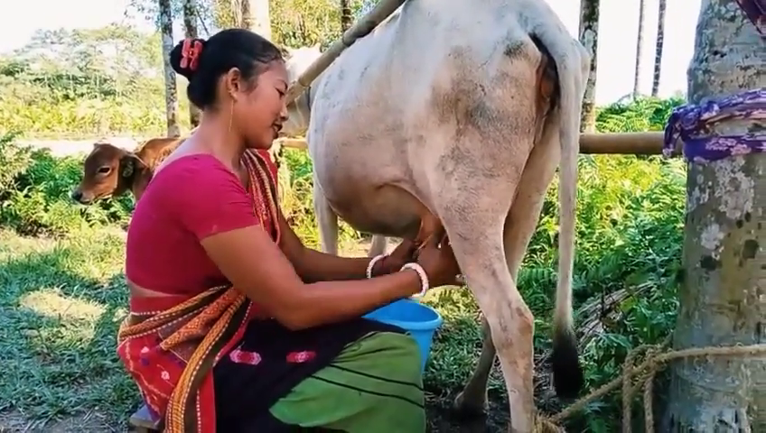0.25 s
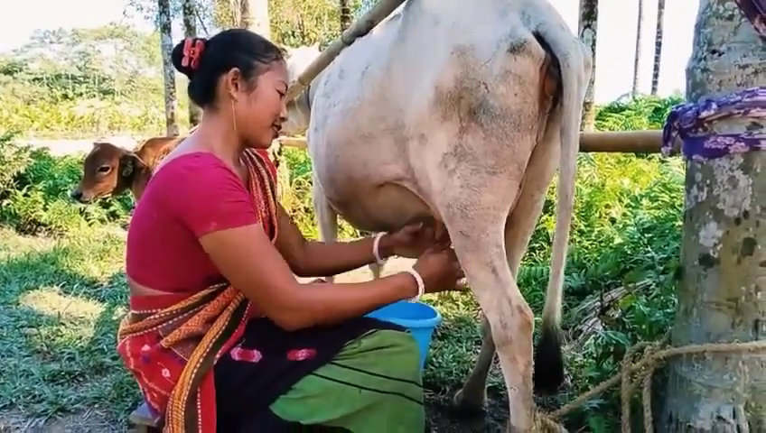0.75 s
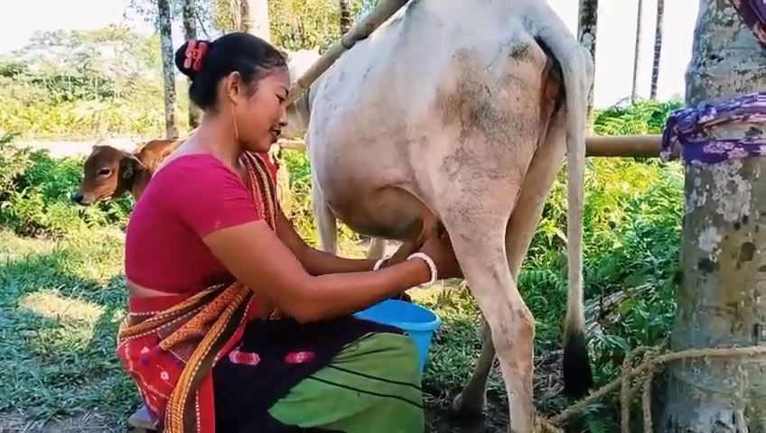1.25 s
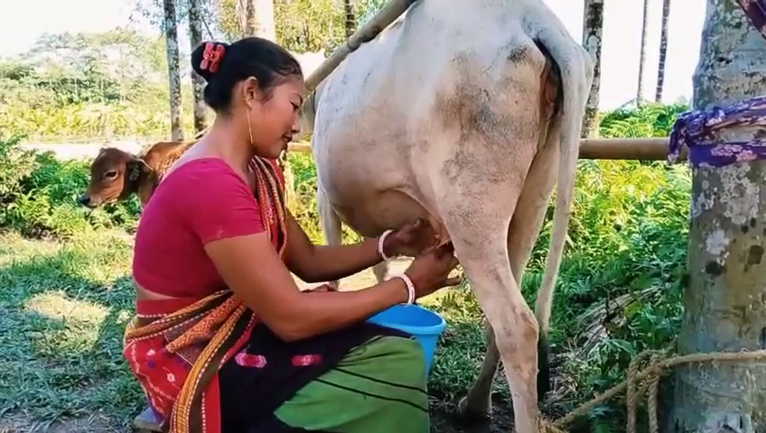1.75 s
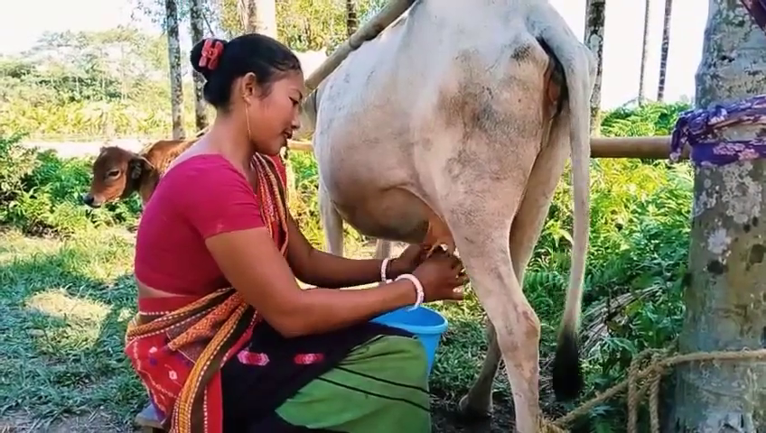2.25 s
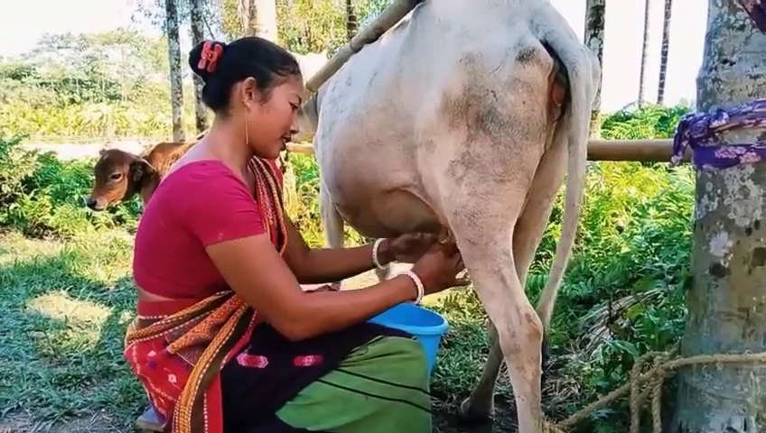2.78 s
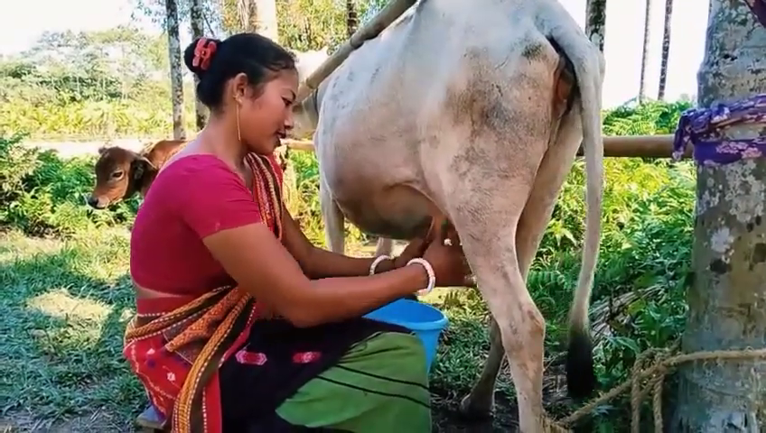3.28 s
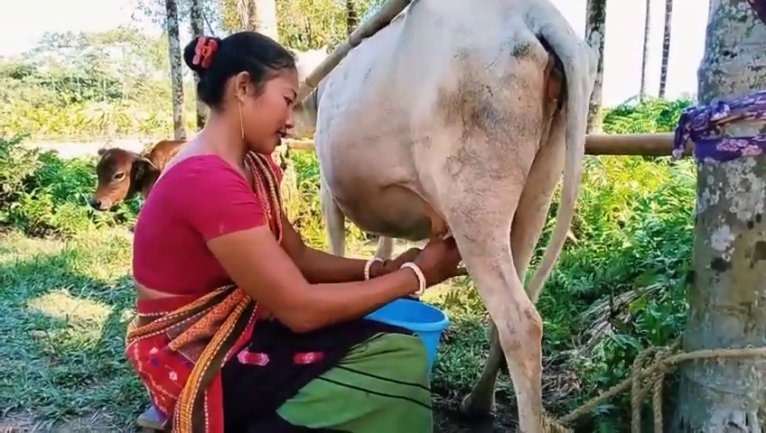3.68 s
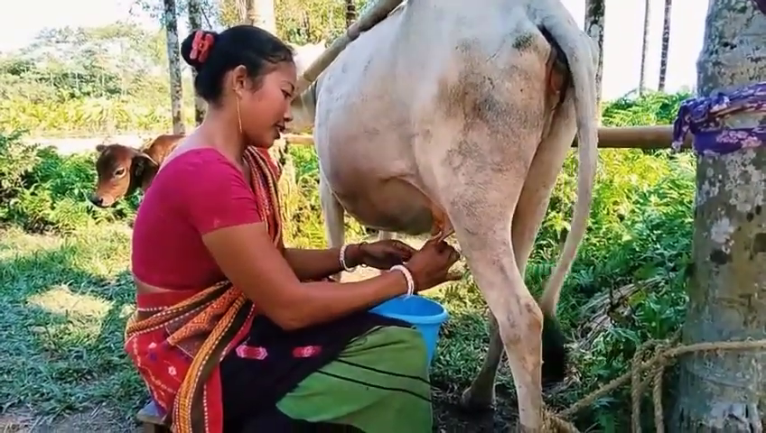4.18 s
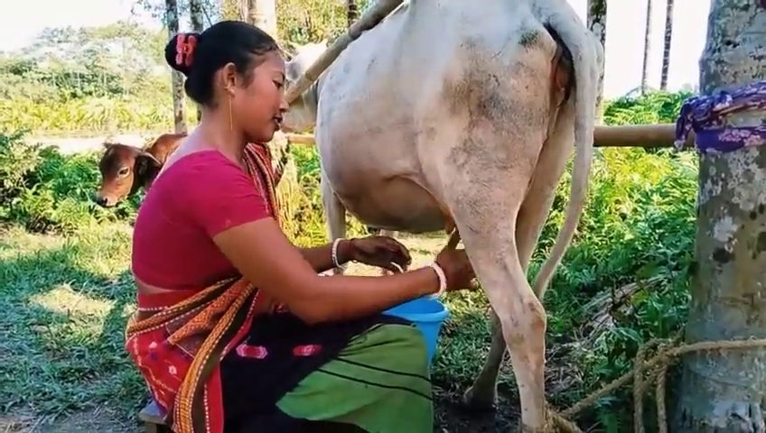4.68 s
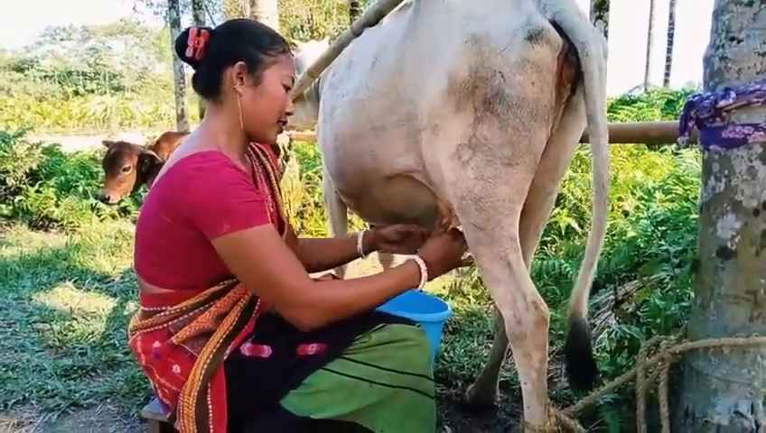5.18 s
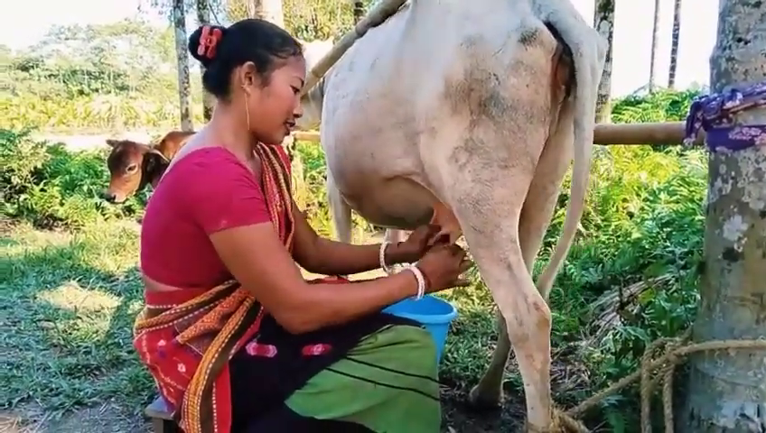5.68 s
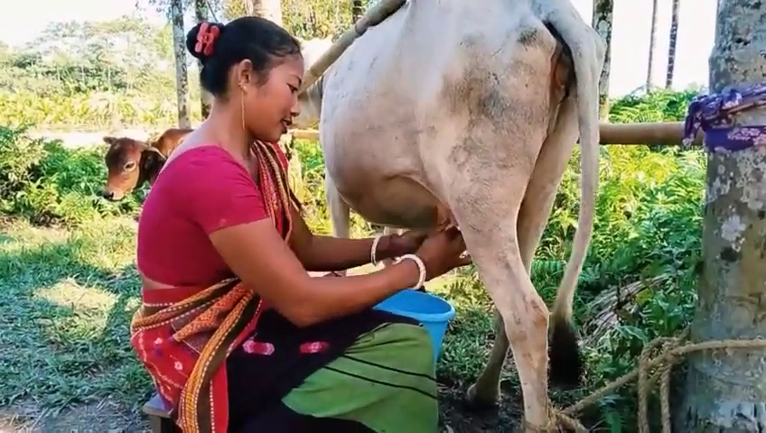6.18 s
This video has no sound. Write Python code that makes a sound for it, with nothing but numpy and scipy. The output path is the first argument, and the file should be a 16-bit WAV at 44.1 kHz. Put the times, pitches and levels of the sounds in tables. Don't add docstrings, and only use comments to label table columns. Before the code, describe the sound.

Outdoors, a stereo microphone sits close to a plastic bucket during hand milking, for about 6.4 seconds. A weak jet is already running at 0 and dies quickly. Further spurts start near 0.3, 1.25, 1.85, 2.35, 3.35, 3.9, 5.3, 5.9 and 6.25, the last still running at the end. Each opens with a small dull slap, sprays in a grainy hiss, and often swings into a hollow wall drumming; the one from 3.9 is long and uneven, the one at 5.9 hard and bright. Stray drops ping around them, strongly near 2.5, 4.05 and 4.3. Dull hooves shift at 0.6, 1.5 and 2.4. A small bird whistles faintly near 0.9, 1.05 and 3.2, echoed by trees. A distant engine drones low over rumble, dulling after 4.2; fainter motors change pitch before 3.5. Leaves hiss and insects buzz thinly throughout.

```python
import sys
import numpy as np
from scipy import signal
from scipy.fft import rfft, irfft, next_fast_len
from scipy.io import wavfile
from scipy.ndimage import uniform_filter1d, map_coordinates

SR = 44100
rng = np.random.default_rng(int(sys.argv[2]) if len(sys.argv) > 2 else 0)


def voltage_ratio(level):
    return 10 ** (np.asarray(level, float) / 20)


def output_pcm(signal):
    pcm = np.clip(np.atleast_2d(signal).T, -1, 1) * 32767
    wavfile.write(sys.argv[1], SR, np.round(pcm).astype(np.int16))


N = 284127


def unit(x):
    return x / np.sqrt(np.mean(x ** 2) + 1e-20)


def along(points, hz):
    f, v = np.transpose(points)
    return np.interp(np.log(hz + 1), np.log(f + 1), v)


def curves(rows, outside=None):
    s, *cols = np.transpose(rows)
    return [np.interp(np.arange(N) / SR, s, c, outside, outside) for c in cols]


def wobble(rate):
    return map_coordinates(rng.standard_normal(int(N * rate / SR) + 4), [np.arange(N) * rate / SR])


def noise():
    return rng.standard_normal((2, N))


def filtered(x, response):
    m = next_fast_len(N + SR // 2)
    return irfft(rfft(x, m) * response(np.fft.rfftfreq(m, 1 / SR)), m)[..., :N]


def modes(table, steep=1):
    def response(f):
        plain = 0
        for k, (c, w, db) in enumerate(table):
            plain = plain + (-1) ** k * voltage_ratio(db) * 1j * f * w / (c * c - f * f + 1j * f * w)
        return plain * abs(plain) ** (steep - 1)
    return response


def ports(pair, alike, side, phase):
    def blend(hz):
        turn = np.arccos(np.clip(along(alike, hz), -1, 1)) / 2
        return np.array([np.cos(turn), np.sin(turn)])

    def lean(hz):
        tilt = voltage_ratio(along(side, hz) / 2) * np.exp(.5j * np.interp(hz, *np.transpose(phase)))
        return np.array([tilt, 1 / tilt])

    a, b = filtered(pair, blend)
    return filtered(np.array([a + b, a - b]), lean)


def patchy(pair, patchy_db, size):
    z = signal.stft(pair, nperseg=512)[2]

    def field(bins, frames):
        grain = uniform_filter1d(rng.standard_normal(z.shape[1:]), bins, 0)
        return unit(uniform_filter1d(grain, frames, 1))

    gain = voltage_ratio(patchy_db * (field(*size) + 1.13 * field(2, 3) + 0.81 * field(3, 16)))
    return signal.istft(z * gain, nperseg=512)[1][:, :N]


def tone(rows):
    hz, db = curves(rows)[0], curves(rows, -150)[1]
    return np.sqrt(2) * voltage_ratio(db) * np.sin(2 * np.pi * np.cumsum(hz) / SR)


def spurt(rows, fine_db, cut_db):
    onset_s, onset_db = .012, 11.5
    cut_s, trickle_s, trickle_db = 0.012, 0.056, 10
    (s0, db0, aim0), (s1, db1, aim1) = rows[0], rows[-1]
    opens = [(s0 - 1.36 * onset_s, db0 - onset_db - 39, aim0 - .3), (s0 - onset_s, db0 - onset_db, aim0 - .3)]
    ends = [(s1 + cut_s + k * trickle_s, db1 - cut_db - k * trickle_db, aim1) for k in (0, 1, 4)]
    db, aim = curves(opens + rows + ends)
    return db, aim, np.full(N, fine_db)


def splashes():
    spits = (rng.random(N) < 160 / SR) * 4.5 * rng.random(N)
    spread = signal.lfilter([1], [1, -np.exp(-1 / (0.0026 * SR))], spits)
    return spread + 2.3 * wobble(260) + 0.51 * wobble(70)


def ringing(table, clumps, clump_share, steep):
    hits = noise() * voltage_ratio(clump_share * clumps + 1.05 * wobble(120))
    return unit(filtered(hits, modes(table, steep)))


# (frequency [Hz], width [Hz], level [dB])
WALL_MODES = [(1054, 102, 2), (1158, 155, 5), (1270, 86, -7), (1505, 257, 1.5), (1752, 200, -5.5),
              (2000, 210, 2.5), (2216, 320, 0.5)]


def wall(aim, clumps):
    spot_hz = 1806 * (1328 / 1806) ** aim
    shares = []
    for hz, width, db in WALL_MODES:
        away_db = 30 * np.log(np.maximum(spot_hz, 500) / hz) ** 2 / 0.56
        damped_db = 59 * np.log(np.maximum(spot_hz / hz, 1)) ** 2
        shares.append(voltage_ratio(db + 3.5 * wobble(13) - away_db - damped_db))
    shares = np.array(shares) / np.linalg.norm(shares, axis=0)
    return sum(share * ringing([mode], clumps, 0.28, 2.29) for share, mode in zip(shares, WALL_MODES))


# (time [s], jet pressure [dB], aim [0 = glancing high on the wall, 1 = square on its belly])
FIRST_HAND_SPURTS = [
    [(0.0, -43, 0.88), (0.046, -45, 0.7), (0.112, -59.5, 1.35), (0.154, -59, 0.47)],
    [(1.259, -42.5, 0.43), (1.312, -29.5, 0.038), (1.406, -33.5, 0.5), (1.538, -32, 0.85),
     (1.58, -41, 0.69)],
    [(2.348, -47.5, 0.22), (2.37, -33.5, .2), (2.492, -33, 0.21), (2.532, -33.5, 0.64), (2.55, -61, 1)],
    [(3.867, -45, 0.41), (3.907, -39.5, 0.3), (3.961, -45.5, 0.53), (4.027, -32, 0.32), (4.093, -35, 0.46),
     (4.355, -41, 0.66), (4.54, -44, 0.99), (4.645, -56, 0.44)],
    [(5.902, -54, 0.28), (5.944, -31, .0), (6.028, -26.5, 0.12), (6.118, -42.5, 1.06), (6.186, -56.5, 1.16)],
]
SECOND_HAND_SPURTS = [
    [(0.278, -47, 0.44), (0.332, -35.5, 0.19), (0.452, -34, 0), (0.516, -41, 0.62), (0.572, -44.5, 0.68)],
    [(1.822, -53.5, 0), (1.878, -40.5, 0.02), (2.004, -32, .2), (2.03, -41, 0.72), (2.118, -39, 0.56),
     (2.208, -57, 0.94), (2.27, -60.5, 0.5)],
    [(3.35, -54, 0.4), (3.365, -40.5, 0.26), (3.451, -35.5, 0.61), (3.617, -34.5, 0.82), (3.647, -31, .35),
     (3.737, -40, 1), (3.79, -49, 0.73)],
    [(5.258, -64, 0), (5.288, -55, 0), (5.305, -42.5, .0), (5.38, -39.5, 0.19), (5.555, -39, 0.86),
     (5.653, -41, 0.86), (5.76, -70.5, 0.92)],
    [(6.24, -58, 0.6), (6.269, -41.5, .0), (6.315, -40.5, 0.43), (6.41, -40, 0.41), (6.44, -31, 0.06)],
]
SPURTS = FIRST_HAND_SPURTS + SECOND_HAND_SPURTS
# (mist from how finely the jet breaks up [dB], drop at letting go [dB])
SPURT_CHARACTER = [(3.5, 12), (2, 23), (0, -2.5), (1.5, 17), (-1.5, 1), (2, 32.5), (-1, 9.5), (2, 12.5),
                   (-1.5, 0), (-2, 16)]
# (frequency [Hz], width [Hz], level [dB])
BUCKET_HUM = [(430, 71, 6.5), (513, 19, -5.5), (655, 75, 0)]
# (frequency [Hz], width [Hz], level [dB])
RIM_MODES = [(2510, 540, -12), (3003, 200, -3.5), (3300, 230, -6.5), (3894, 780, -8.5), (5050, 1160, -10)]
# (frequency [Hz], width [Hz], level [dB])
MIST_MODES = [(6075, 1150, -5), (7340, 275, -1.5), (7880, 450, -3), (10140, 1760, -8.5)]
# (frequency [Hz], width [Hz], level [dB])
FIZZ_MODES = [(12100, 3400, 0.5), (15600, 1500, 3)]
# (frequency [Hz], likeness [-1 to 1])
JET_LIKENESS = [(400, 0.9), (1000, 0.84), (2500, 0.57), (5000, 0.66), (10000, 0.26)]
# (frequency [Hz], left over right [dB])
JET_BALANCE = [(400, -2), (1200, -2.5), (2400, -1), (5000, -2), (9000, 1.5), (14000, 6.5)]
# (frequency [Hz], left lead [rad])
JET_LEAD = [(0, 0), (3010, -1.0), (4570, -2), (6120, -1.5), (7150, -1), (8180, -3.3), (8440, 0.5),
            (9470, 4), (10400, 3.5), (11300, 6.5), (12700, -7), (13700, -1), (14900, -7.5), (16100, 4)]


def jets():
    each = np.array([spurt(rows, *character) for rows, character in zip(SPURTS, SPURT_CHARACTER)])
    strongest = each[:, :1].argmax(axis=0)[None]
    spray_db, aim, fine_db = np.take_along_axis(each, strongest, axis=0)[0]
    firm_db = -36
    spray_db = spray_db + 4.4 * wobble(60) * np.clip((firm_db - 8 - spray_db) / 10, 0, 1)
    wall_db = -12 + 16 * aim
    square = (1 + np.tanh((aim - 0.45) / .3)) / 2
    hum_db = -41.5 + 26.5 * square + 3 * wobble(8)
    mist_db = 1 + fine_db - aim + 0.34 * np.minimum(firm_db - spray_db, 30)
    clumps = splashes()
    out = ringing(RIM_MODES, clumps, 0.3, 1.26)
    out = out + voltage_ratio(wall_db) * wall(aim, clumps)
    out = out + voltage_ratio(hum_db) * ringing(BUCKET_HUM, clumps, 0.38, 2.65)
    film = ringing(MIST_MODES, clumps, 1.0, 1.1) + voltage_ratio(-8.5) * ringing(FIZZ_MODES, clumps, 0.58, 1.1)
    out = out + voltage_ratio(mist_db) * film
    spray = voltage_ratio(spray_db - 1.5) * patchy(out, patchy_db=2.5, size=(8, 5))
    return ports(spray, JET_LIKENESS, JET_BALANCE, JET_LEAD)


# (time [s], firing rate [Hz], level [dB])
ENGINE_RUN = [(0.0, 59, -32), (0.14, 60.33, -43.5), (0.5, 59.2, -35), (0.73, 59, -40.5),
              (1.0, 56.96, -33.5), (1.47, 57.62, -38.5), (1.74, 56.32, -34.5), (2.62, 59.5, -38.5),
              (2.96, 57.3, -39), (3.12, 57.05, -32.5), (3.77, 56.02, -38), (4.03, 48.6, -40.5),
              (4.66, 51.13, -38), (4.95, 57.55, -39.5), (5.2, 59.65, -35), (5.4, 59.53, -42),
              (5.88, 61.34, -40.5), (6.44, 60.8, -59)]


def engine():
    hz, first_db = curves(ENGINE_RUN)
    hidden_s = np.maximum(np.arange(N) / SR - 4.22, 0)
    second_db = -45 + 0.28 * (first_db + 33.5) - 8.5 * hidden_s
    turn = 2 * np.pi * np.cumsum(hz) / SR
    flutter_db = (1.4 + hidden_s) * wobble(12)
    orders = voltage_ratio(first_db + flutter_db) * np.sin(turn)
    orders += voltage_ratio(second_db + 1.5 * wobble(12)) * np.sin(2 * turn + 1.03)
    orders += voltage_ratio(second_db - 20.5 + 3.7 * wobble(17)) * np.sin(3 * turn)
    return np.sqrt(2) * orders


# (time [s], pitch [Hz], level [dB])
MACHINE_RUNS = [
    [(0, 78, -46), (.7, 84.7, -49), (1.3, 88.6, -50), (1.6, 90.5, -50)],
    [(1.3, 47.94, -59), (1.6, 43.5, -44.5), (2.3, 37.17, -52.5), (3.1, 31, -56.5), (3.5, 29.95, -49)],
]


def machines():
    return sum(tone(rows) * voltage_ratio(0.85 * wobble(8.9)) for rows in MACHINE_RUNS)


# (frequency [Hz], level [dB per Hz])
RUMBLE_SPECTRUM = [(12, -37), (20, -11.5), (48, 4), (75, 0), (134, -17), (156, -19), (186, -23.5),
                   (232, -40), (330, -63), (430, -100), (730, -120)]
# (frequency [Hz], likeness [-1 to 1])
FAR_LIKENESS = [(60, 1), (130, 0.87), (290, 0.68), (640, 0.38), (1410, -0.86), (3100, -0.059),
                (6820, -0.32), (15000, 0.2)]
# (frequency [Hz], left over right [dB])
FAR_BALANCE = [(60, -2.5), (110, -2.5), (200, -0.5), (380, -3), (700, -2), (1290, -1.5), (2380, -5.5),
               (4400, -1.5), (8120, 2), (15000, 7.5)]
# (frequency [Hz], left lead [rad])
FAR_LEAD = [(0, 0), (3000, -2.2)]


def rumble():
    low = unit(filtered(noise(), lambda f: voltage_ratio(along(RUMBLE_SPECTRUM, f))))
    return voltage_ratio(-42.5) * ports(low, FAR_LIKENESS, FAR_BALANCE, FAR_LEAD)


# (frequency [Hz], level [dB per Hz])
AIR_SPECTRUM = [(150, -3), (250, -9.5), (427, -25.5), (457, -18), (1550, -14), (1750, -13), (2190, -25),
                (4770, -27.5), (5570, -34.5), (6620, -26.5), (8000, -26.5), (9020, -10), (11300, -36.5),
                (15400, -32)]


def air():
    hiss = filtered(noise(), lambda f: voltage_ratio(along(AIR_SPECTRUM, f)))
    hiss = voltage_ratio(-62) * unit(patchy(hiss, patchy_db=1.2, size=(6, 15)))
    return ports(hiss, FAR_LIKENESS, FAR_BALANCE, FAR_LEAD)


# (frequency [Hz], width [Hz], level [dB])
INSECT_MODES = [(9100, 640, 0), (9300, 250, -4.5), (9800, 1200, 1)]


def insects():
    beat = np.cos(2 * np.pi * np.cumsum(163 + 4 * wobble(2.7)) / SR)
    buzz = unit(filtered(noise() * voltage_ratio(4.9 * beat), modes(INSECT_MODES, steep=3.2)))
    return ports(voltage_ratio(-70 + .3 * wobble(3.3)) * buzz, FAR_LIKENESS, FAR_BALANCE, FAR_LEAD)


# (time [s], peak level [dB], pitch [Hz])
STRAY_DROPS = [(0.046, -16.5, 8240), (0.1476, -24.5, 6400), (0.273, -26, 5880), (0.929, -32, 7650),
               (0.9337, -34.5, 7360), (0.977, -19, 7960), (0.9828, -24, 7900), (1.612, -28, 2780),
               (1.828, -27, 7300), (1.8779, -21, 4150), (2.2262, -34, 7010), (2.243, -24, 7100),
               (2.338, -24, 5900), (2.4958, -12, 4390), (2.567, -22.5, 1336), (2.591, -33, 7800),
               (2.605, -29.5, 1315), (3.8413, -28.5, 8500), (3.8603, -26, 1910), (4.0673, -12.5, 7980),
               (4.2963, -15, 8525), (4.6373, -30, 6476), (5.251, -32.5, 7060), (5.2894, -19, 6470),
               (5.3018, -17, 7585), (5.7701, -35.5, 7940), (5.8049, -39.5, 2822), (5.8936, -28.5, 8610),
               (6.2269, -29, 8500), (6.32, -16, 9800)]
# (frequency [Hz], width [Hz], level [dB])
KNOCK_MODES = [(459, 68, 7), (1270, 500, -23)]


def drops():
    out, knocks = np.zeros((2, N + SR)), np.zeros(N)
    t = np.arange(SR // 25) / SR
    for s, db, hz in STRAY_DROPS:
        pitches = hz * np.array([1, 0.83, 1.28, 1.2])[:, None]
        decay = voltage_ratio(-60 * t * (pitches / 45) ** .5 / 0.18)
        ping = decay * np.sin(2 * np.pi * pitches * t + rng.uniform(0, 6.5, (2, 4, 1)))
        crack = 0.27 * hz / 8000 * voltage_ratio(-60 * t / 0.027) * rng.standard_normal((2, len(t)))
        body = (ping * voltage_ratio([[0], [-8], [-9], [-16]])).sum(axis=1) + np.diff(crack, prepend=0)
        out[:, round(s * SR):][:, :len(t)] += voltage_ratio(db - 3.5) * body * (1 - np.exp(-t / 0.00012))
        knock_db = -10.5 if hz < 1500 else -45
        knocks[round(s * SR)] = voltage_ratio(db + knock_db + 33)
    pings = ports(out[:, :N], JET_LIKENESS, JET_BALANCE, JET_LEAD)
    return pings + filtered(knocks, lambda f: modes(KNOCK_MODES)(f) ** 2)


# (frequency [Hz], width [Hz], level [dB])
SLAP_MODES = [(280, 300, 6), (800, 900, -9), (3000, 5000, -11)]


def slaps():
    blows = np.zeros(N)
    for rows in SPURTS[1:]:
        lands_s = next(s for s, db, aim in rows if db > -63) - .004
        blows[round(lands_s * SR)] = voltage_ratio(-26.5 + rng.normal(0, 3))
    return filtered(blows, modes(SLAP_MODES))


# (time [s], peak level [dB])
HOOF_THUDS = [
    (0.599, -49),
    (1.499, -53),
    (1.929, -63),
    (2.399, -42),
]


def thuds():
    t = np.arange(N) / SR
    return sum(voltage_ratio(db - 60 * abs(t - s - .03) / 0.27) * np.sin(2 * np.pi * 152 * t) for s, db in HOOF_THUDS)


# (time [s], pitch [Hz], level [dB])
BIRD_NOTES = [
    [(.85, 4240, -68), (.87, 4174, -62), (.895, 4130, -63), (.92, 3895, -72)],
    [(.995, 3120, -72), (1.03, 3820, -67), (1.055, 4400, -59), (1.085, 4330, -63), (1.12, 3830, -64),
     (1.15, 3330, -70), (1.16, 3300, -78)],
    [(2.96, 4800, -84), (3.03, 4950, -80), (3.07, 4900, -82)],
    [(3.185, 3870, -74), (3.22, 3670, -58), (3.25, 3392, -72), (3.28, 3520, -87)],
]


def bird():
    song = sum(tone(rows) for rows in BIRD_NOTES) * voltage_ratio(4.3 * wobble(220) + 2.5)
    t = np.arange(SR // 2) / SR
    trees = rng.standard_normal((2, len(t))) * voltage_ratio(-60 * t / 0.32)
    echo = signal.fftconvolve(song[None], trees / np.linalg.norm(trees[0]), axes=1)[:, :N]
    return voltage_ratio(-9) * song + echo


def scene():
    close = jets() + drops() + slaps()
    far = engine() + machines() + rumble() + air() + insects()
    return close + far + thuds() + bird()


def low_pass(x):
    return signal.sosfilt(signal.butter(12, 16530, fs=SR, output="sos"), x)


def record(dry):
    top_hz = 15650
    heard = filtered(dry, lambda hz: 1 / (1 + (hz / top_hz) ** 200))
    return low_pass(heard)


dry = scene()
out = record(dry)
output_pcm(out)
```